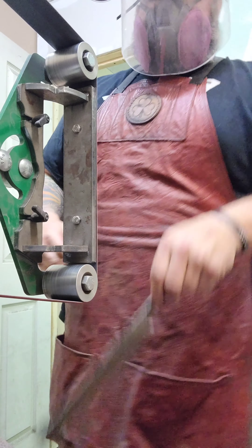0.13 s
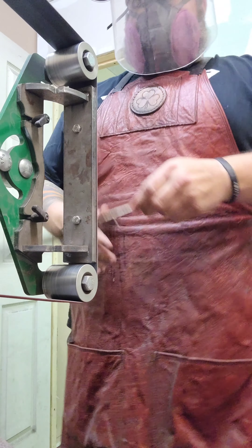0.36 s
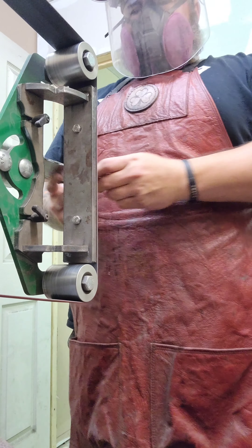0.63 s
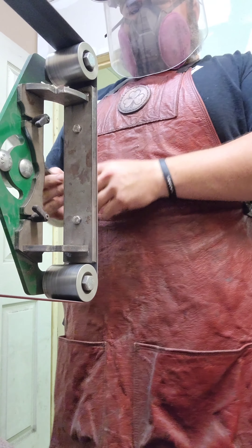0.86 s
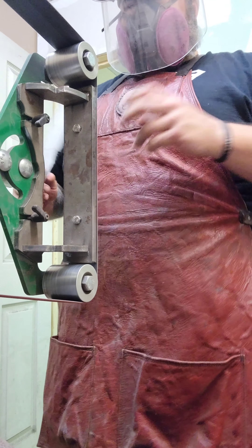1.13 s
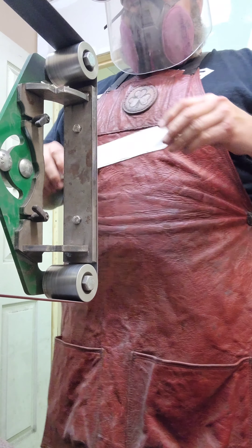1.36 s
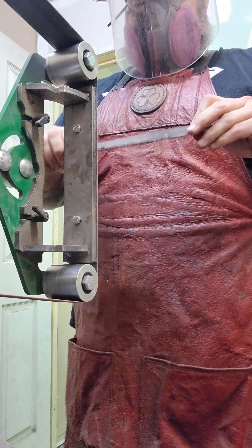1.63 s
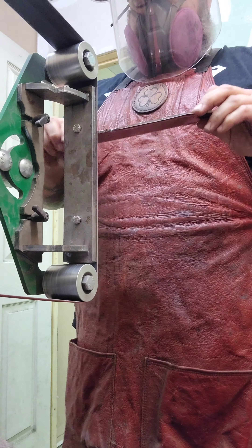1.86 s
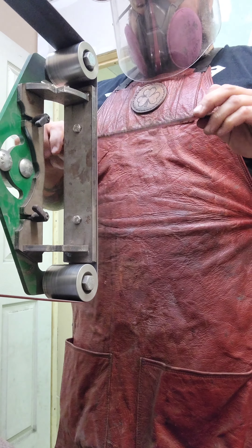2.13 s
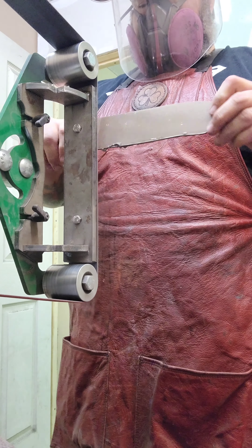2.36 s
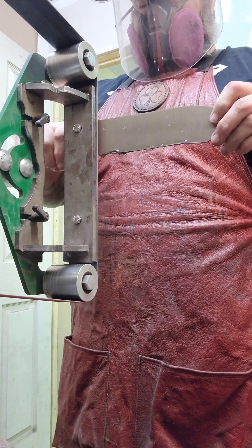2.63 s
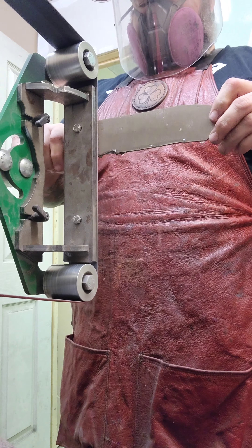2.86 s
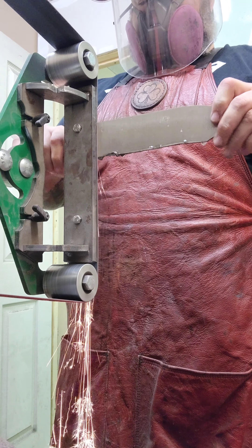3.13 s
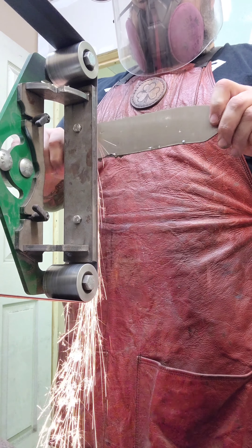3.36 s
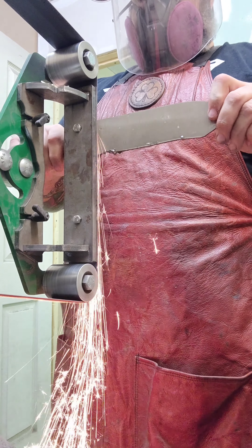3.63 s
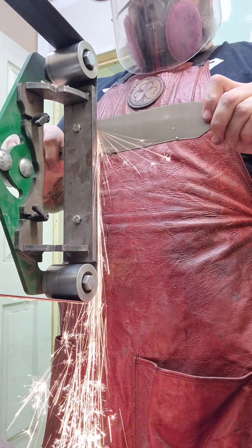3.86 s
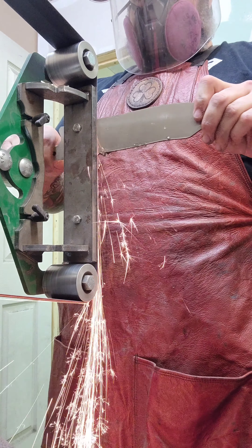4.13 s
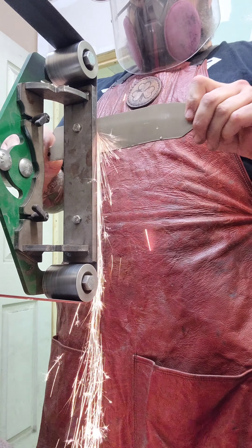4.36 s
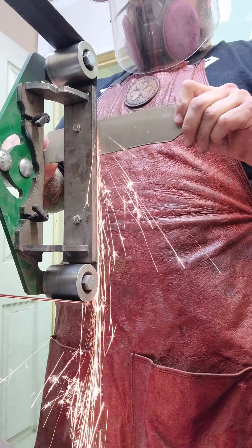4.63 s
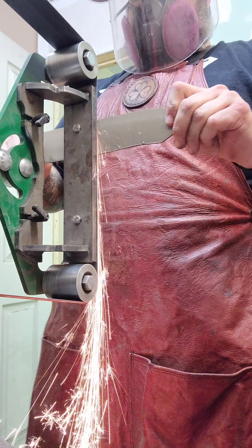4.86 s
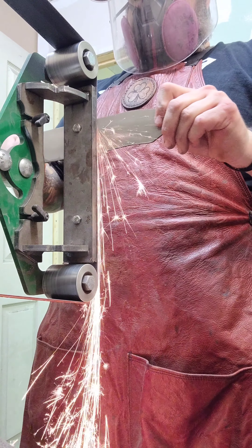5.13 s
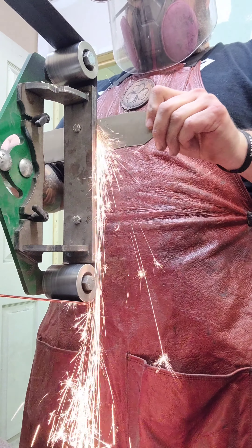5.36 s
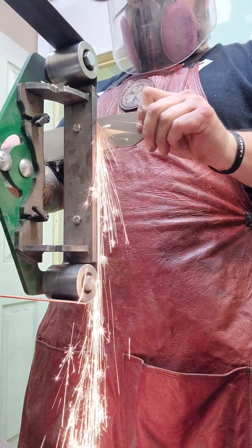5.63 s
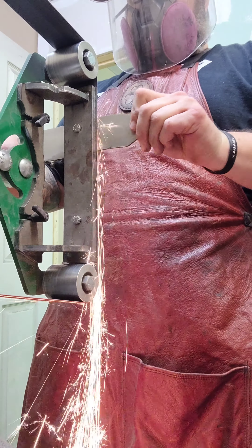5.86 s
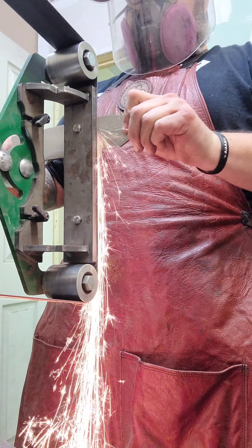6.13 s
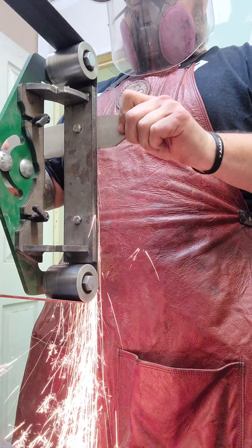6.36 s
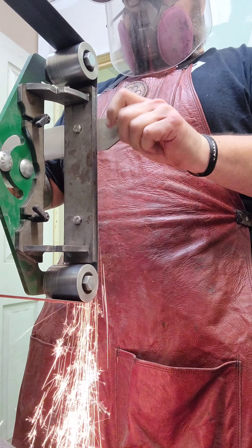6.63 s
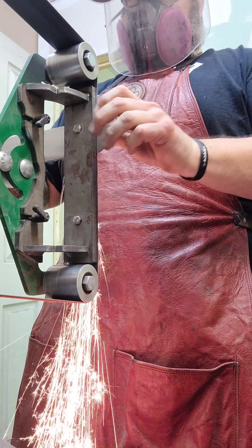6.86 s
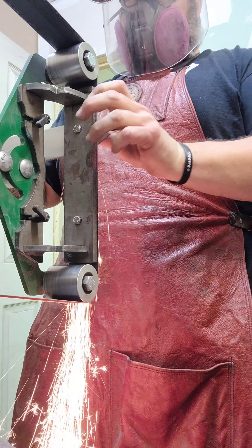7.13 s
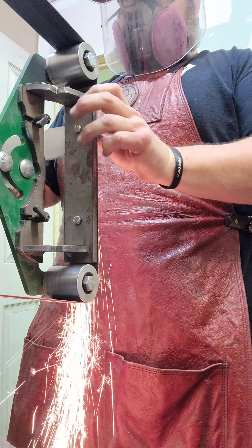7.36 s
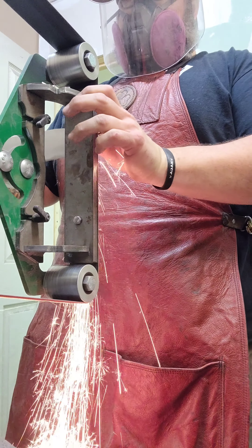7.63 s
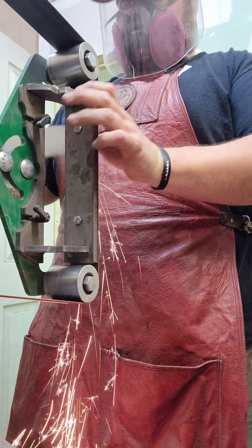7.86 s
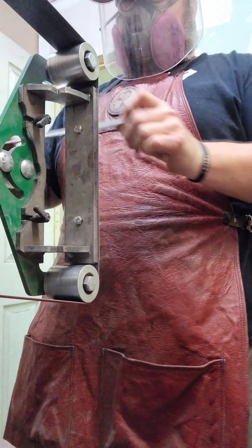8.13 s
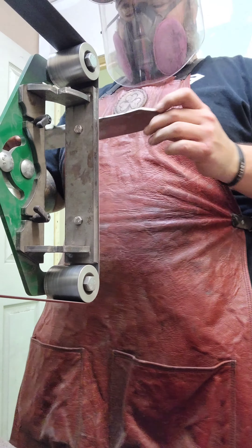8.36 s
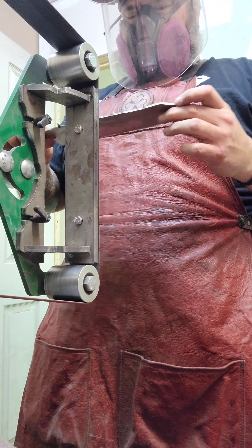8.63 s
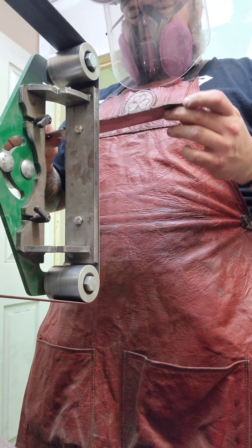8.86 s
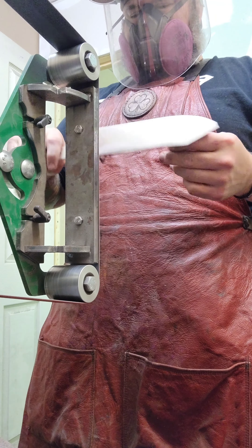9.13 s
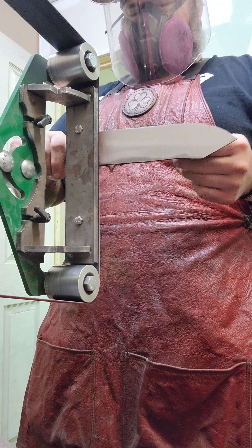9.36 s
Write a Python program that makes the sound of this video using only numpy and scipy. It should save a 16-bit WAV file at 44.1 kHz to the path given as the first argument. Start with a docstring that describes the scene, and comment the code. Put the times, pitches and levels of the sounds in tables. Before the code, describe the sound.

A close stereo microphone hears a grinder with a dense, bright, slightly fluttering belt noise, low roller hum and a thin wavering motor whine. A steel edge whistles briefly on contact, followed by a dull thud. Low, rough rumbling and a mid-pitched metallic rasp join the belt, shifting as the blade slides across. Then the grinding stops abruptly, leaving the steady machine in a small reflective workshop.

```python
"""In a small workshop a belt grinder runs. The grit of its belt sings over platen and rollers as noise and
close tones that partly repeat every lap; motor and roller bearings hum as harmonics tied to the belt.
A steel blade is laid on with a chirp and a thud, rumbles and rasps through resonances while it is drawn
across, and is lifted off. Two microphone ports hear the machine from the right."""
import sys
import numpy as np
from scipy import signal
from scipy.fft import rfft, irfft
from scipy.io import wavfile

SR = 44100
rng = np.random.default_rng(int(sys.argv[2]) if len(sys.argv) > 2 else 0)


def voltage_ratio(decibels):
    """Convert decibels (scalar or array-like) to amplitude ratios, 20 dB per decade."""
    exponent = np.asarray(decibels, float) / 20
    return 10 ** exponent


def dump_mix(stems):
    """Bounce the given channels to the path in sys.argv[1] as a 16-bit WAV at rate SR."""
    frames = np.atleast_2d(stems).T  # one column per channel
    limited = np.clip(frames, -1, 1)  # hard clip at full scale
    pcm = np.round(limited * 32767).astype(np.int16)
    wavfile.write(sys.argv[1], SR, pcm)


N = 418509

TOUCH_S, LIFT_S = 3.04, 7.95   # the blade first touches the belt, and is lifted
FREE_LAPS, LOADED_LAPS = 10.81, 10.96   # belt speeds, in laps per s, between which the upper hum changes


def in_time(rows):
    """Linear interpolation: the columns of a table, after its times in s, become curves."""
    s, *columns = np.transpose(rows)
    return [np.interp(np.arange(N) / SR, s, column) for column in columns]


def at_hz(points, hz):
    """Logarithmic frequency scale: a spectrum is read between its points on a log axis."""
    points = np.array(points)
    return np.interp(np.log(hz + 1), np.log(points[:, 0]), points[:, 1])


def drift(rate_hz):
    """Low-pass random process: noise through two equal poles wanders slowly, with standard deviation 1."""
    pole = np.exp(-80 * np.pi * rate_hz / SR)   # one step lasts 40 samples
    white = rng.standard_normal(N // 40 + 4002)
    slow = signal.lfilter([1], [1, -2 * pole, pole * pole], white)[4000:]
    return np.interp(np.arange(N) / 40, np.arange(len(slow)), slow / slow.std())


def pan(left_right_db):
    """Level difference: gains of the left and right port, half the difference each way."""
    return voltage_ratio([[left_right_db / 2], [-left_right_db / 2]])


def read_belt(profile, laps):
    """Fourier synthesis: one lap of surface, given as strength per cycle count, is read at the belt's position."""
    size = 2 ** 15
    surface = irfft(profile, size) * size / np.sqrt(2)
    closed = np.append(surface, surface[0])
    return np.interp(laps % 1 * size, np.arange(size + 1), closed)


def pattern(cycles, level_db, pan_db, laps, turn, waver_db):
    """Amplitude modulation: surface ripples lie in five tracks that press harder and softer on their own."""
    profile = np.zeros((2, 2000), complex)
    port_db = level_db + 1.5 + np.outer([.5, -.5], pan_db)
    profile[:, np.round(cycles).astype(int)] = voltage_ratio(port_db) * np.exp(2j * np.pi * turn)
    tracks = np.arange(2000) % 5
    total = 0
    for k in range(5):
        ports = np.array([read_belt(p * (tracks == k), laps) for p in profile])
        total = total + voltage_ratio(waver_db * drift(3.6)) * ports
    return total


# Periodicity of the grit noise: pitch_hz, power share alike in each lap (0-1)
REPEAT_SHARE = [(100, .5), (300, .7), (700, .6), (1500, .5), (3000, .78), (6500, .78), (8000, .22),
                (16000, .15)]
# Coherence of the ports: pitch_hz, left-right likeness (0-1)
PORT_LIKENESS = [(50, 0.65), (300, 0.81), (800, 0.7), (2500, 0.3), (5000, 0.74), (7500, 0.15), (16000, 0.2)]
# Level difference of the ports: pitch_hz, left_right_db
PORT_BALANCE = [(60, -4), (100, -1), (160, -6.5), (270, -3), (450, -14), (740, -5), (1220, -10),
                (2010, -7.5), (3330, -5), (5500, -10.5), (7500, -3), (9500, -1), (12500, -4.5), (14500, 10),
                (15600, 6)]
# Lag of the right port by the direct path and by way of the bench: lag_s
RIGHT_PATHS = [.00007, 0.000298]


def grit(laps):
    """Partial coherence: white noise spectra at both ports, partly the same every lap and partly fresh."""
    hz = np.fft.rfftfreq(N, 1 / SR)
    again = np.clip(at_hz(REPEAT_SHARE, hz), 0, 1)
    alike = np.clip(at_hz(PORT_LIKENESS, hz), 0, 1)
    heard = []
    for port in range(2):
        profile = rng.normal(size=2000) + 1j * rng.normal(size=2000)
        # these ripples are played on their own
        profile[[round(row[0]) for row in GRIT_RIDGES + BELT_WAVES]] = 0
        lap = read_belt(profile, laps)
        repeated = np.sqrt(again) * rfft(lap / lap.std())
        fresh = np.sqrt(1 - again) * rfft(rng.normal(size=N))
        heard.append(repeated + fresh)
    direct, bench = (np.exp(2j * np.pi * hz * s) for s in RIGHT_PATHS)
    right = heard[1]
    left = alike * (.75 * direct + .66 * bench) * right + np.sqrt(1 - alike ** 2) * heard[0]
    return hz, np.array([left, right]) * voltage_ratio(np.outer([.5, -.5], at_hz(PORT_BALANCE, hz)))


def coloured(noise, spectrum, peaks=(), lift_db=4.0):
    """Spectral shaping: noise through a spectrum with resonances on top; the mean of the ports has rms 1."""
    hz, white = noise
    gain_db = at_hz(spectrum, hz)
    for centre_hz, width_hz, _ in peaks:
        gain_db = gain_db + lift_db / (1 + (2 * (hz - centre_hz) / width_hz) ** 2)
    out = irfft(white * voltage_ratio(gain_db), N)
    return out / out.mean(axis=0).std()


# Strongest ridges of the grit, relative levels: cycles_per_lap, free_db, under_blade_db, left_right_db
GRIT_RIDGES = [(149, -57, -56, -14), (185, -55, -52, -8), (186, -54, -56, -10), (194, -58, -54, -5),
               (201, -55, -54, -10), (209, -51, -59, -9), (212, -58, -55, -4), (229, -56, -52, -8),
               (233, -53, -55, -9), (253, -50, -59, -11), (262, -54, -47, -10), (267, -47, -51, -3),
               (286, -43, -51, -2), (287, -44, -44, -8), (291, -44, -48, -7), (297, -44, -39, -5),
               (302, -42, -43, -14), (303, -43, -44, -13), (313, -42, -41, -10), (314, -40, -42, -8),
               (318, -43, -47, -10), (324, -40, -48, -13), (347, -43, -43, -9), (359, -51, -40, -4),
               (369, -43, -40, -6), (379, -39, -46, -11), (392, -41, -44, -13), (412, -41, -41, 0),
               (418, -43, -40, -5), (426, -46, -41, -5), (427, -43, -42, -7), (428, -41, -40, -7),
               (433, -38, -38, -10), (438, -42, -41, -13), (445, -42, -42, -8), (449, -42, -50, -6),
               (471, -42, -34, -9), (483, -39, -40, -9), (500, -41, -40, -17), (510, -41, -41, -8),
               (523, -41, -44, -11), (536, -38, -42, -16), (546, -37, -40, -16), (570, -52, -42, -12),
               (588, -44, -46, -12), (600, -39, -41, -9), (612, -42, -44, -14), (624, -45, -47, -13)]
# Spectrum of the song: pitch_hz, relative level_db (per Hz)
SONG_SPECTRUM = [(800, -23), (1410, -20), (2400, -22.5), (2750, -10), (3320, -2), (3600, -7), (3940, 1.5),
                 (4320, -3), (4620, 0.5), (4950, 1), (5290, 2), (6610, -1.5), (7600, -14), (9880, -29),
                 (16700, -120)]
# Resonances of the platen: centre_hz, width_hz, level_db (not read; all get one lift)
PLATEN_MODES = [(3200, 150, -2), (4080, 520, -2), (4800, 350, -1), (5500, 140, 0), (5500, 63, 0),
                (6900, 100, -2), (6800, 80, -7)]
# Spectrum of the air hiss: pitch_hz, relative level_db (per Hz)
AIR_SPECTRUM = [(4410, -30), (7500, 0.5), (7730, -4.5), (8350, -1), (9580, -2), (10700, 1.5), (14900, -10),
                (15600, -4)]


def belt(laps, contact):
    """Periodic excitation: grit sings on the platen, ridges as wavering tones, hiss above; all swell once a lap."""
    t = np.arange(N) / SR
    # briefly quieter as the blade comes free
    dip_db = -1 * np.exp(-((t - LIFT_S) / .08) ** 2)

    cycles, free_db, loaded_db, pan_db = np.transpose(GRIT_RIDGES)
    port_turn = np.outer([1, 0], rng.normal(0, 0.16, len(cycles)))
    turn = rng.random(len(cycles)) + port_turn
    free = pattern(cycles, free_db - .8, pan_db, laps, turn, waver_db=2.0)
    loaded = pattern(cycles, loaded_db - 1.2, pan_db, laps, turn, waver_db=2.2)
    ridges = (1 - contact) * free + contact * loaded

    noise = grit(laps)
    song = voltage_ratio(-21 + dip_db + .35 * drift(7.2)) * coloured(noise, SONG_SPECTRUM, PLATEN_MODES, lift_db=0.5)
    air = voltage_ratio(-27 + dip_db + .46 * drift(4.7)) * coloured(noise, AIR_SPECTRUM)

    # the swell per lap waxes and wanes; it falls later in the lap under the blade
    depth_db = 1.05 + .55 * np.cos(2 * np.pi * (t - 2.1) / 3.4)
    lap_phase = 2 * np.pi * (laps - .33 - .27 * contact)
    # the dip of each lap is narrower than its swell
    swell_db = depth_db * (np.cos(lap_phase) - .4 * np.cos(2 * lap_phase))
    # the swell lives mostly above 4900 Hz
    low_pass = signal.butter(4, 4900, fs=SR, output="sos")
    low = signal.sosfiltfilt(low_pass, song + ridges)
    high = song + ridges + air - low
    return low * voltage_ratio(.05 * swell_db) + high * voltage_ratio(swell_db)


def mode(noise, centre_hz, width_hz):
    """Resonance: noise through a steep-sided peak; the mean of the ports has rms 1."""
    hz, white = noise
    detuning = (hz - centre_hz) / width_hz * 1.4
    out = irfft(white / (1 + detuning ** 2) ** 2, N)
    return out / out.mean(axis=0).std()


# Waves in the belt that shake the blade, relative levels: cycles_per_lap, level_db, left_right_db
BELT_WAVES = [(13, -53, -21), (14, -52.5, -5), (15, -46, -10), (16, -41, -4), (17, -48, -6), (19, -37, -6),
              (20, -42, -8), (21, -30, -3), (22, -38.5, -16), (25, -41.5, -5), (27.1, -37.5, 0),
              (28.2, -41, 1), (30, -47.5, -1), (31, -48.5, -8), (32, -48, -7), (34, -56, 2), (38, -53.5, 6),
              (39, -52, -15.5), (42.83, -41, -8.5), (43, -46.5, -7), (45, -58, 9), (52, -51.5, 9),
              (58, -55, 16), (89.6, -57, -24), (95, -58, -10), (97.6, -41.5, -16), (98.8, -52, -7),
              (117.6, -48.5, -21), (123, -49, -14), (143.5, -47, -8), (183.3, -52, 0)]
# How hard the blade is pressed, as the gain of its rumble: time_s, level_db
PRESSING = [(3.05, -18), (3.2, -28), (3.33, -35.5), (3.6, -30), (3.98, -30.5), (4.3, -29.5), (5.1, -29),
            (5.95, -27), (6.32, -32), (6.9, -31.5), (7.3, -30.5), (7.66, -34), (7.95, -38)]
# Spectrum of the rumble: pitch_hz, relative level_db (per Hz)
RUMBLE_SPECTRUM = [(60, -45), (110, -38), (150, -3), (231, 4), (340, 3), (456, -12.5), (560, -37),
                   (655, -4.5), (900, -15.5), (1100, -51)]
# Spectrum of the rasp: pitch_hz, relative level_db (per Hz)
RASP_SPECTRUM = [(500, -32), (650, -5), (850, -0.5), (1200, -21.5), (2000, 0.5), (2350, -26), (2700, 6),
                 (3300, -27)]
# Blade modes: centre_hz, width_hz
BLADE_MODES = [(165, 60), (465, 110), (1055, 150), (1370, 250), (1660, 230)]
# Modes swell and sink as their nodes pass the belt, a row for each blade mode: level_db (mid-reach, before
# the swing), middle_s, fall_db_per_s2, swing_db, swell_s (time of one swell), period_s (between swells)
MODE_SWELLS = [(-43.5, 5.6, 1, 5, 4.25, 1.73), (-38, 4.6, 0.87, 4, 4.45, 2.07),
               (-36, 4.7, 2.5, 4, 4.14, 1.42), (-38.5, 3.4, 0.28, 2.5, 2.65, 4.6),
               (-50.5, 5.55, -1.5, 6, 3.46, 1.32)]


def blade(laps, contact):
    """Forced vibration: belt waves shake the blade in a low growl; the cut rasps and excites the blade's modes."""
    press_db, = in_time(PRESSING)
    t = np.arange(N) / SR
    noise = grit(laps)

    cycles, level_db, pan_db = np.transpose(BELT_WAVES)
    turn = rng.random(len(cycles)) + np.outer([.005, 0], cycles)
    growl = pattern(cycles, level_db + 27.5, pan_db, laps, turn, waver_db=2.0) * voltage_ratio(.9 * drift(7))
    rough = voltage_ratio(-12 + 3 * drift(9)) * coloured(noise, RUMBLE_SPECTRUM)
    rumble = voltage_ratio(press_db) * (growl + rough)

    # the rasp fades by 1 dB per s
    rasp = voltage_ratio(-41 - (t - TOUCH_S) + 4 * drift(6.6)) * coloured(noise, RASP_SPECTRUM)

    rings = 0
    for (centre_hz, width_hz), row in zip(BLADE_MODES, MODE_SWELLS):
        mid_db, middle_s, fall, swing_db, swell_s, period_s = row
        reach_db = mid_db - fall * (t - middle_s) ** 2
        ring_db = reach_db + swing_db * np.cos(2 * np.pi * (t - swell_s) / period_s)
        rings = rings + voltage_ratio(ring_db + 2 * drift(19)) * mode(noise, centre_hz, width_hz)
    return contact * (rumble + rasp + rings)


# Whistling modes of the edge: pitch_hz (mean), relative level_db
EDGE_MODES = [(10430, 0), (6900, -1)]
# Whistles of the edge: peak_s, level_db (before mode and port gains), rise_s (9 dB up to the peak),
# fall_t60_s (60 dB down)
EDGE_WHISTLES = [(2.975, -23, .035, .22), (4.2, -38, .3, 1.5)]


def chirp():
    """Frequency modulation: the edge whistles around the first touch and faintly once more, near the right port."""
    waver_hz = 35 * drift(30)
    tones = 0
    for pitch_hz, level_db in EDGE_MODES:
        phase = 2 * np.pi * np.cumsum(pitch_hz + waver_hz) / SR
        tones = tones + voltage_ratio(level_db + 2 * drift(40)) * np.sin(phase)
    t = np.arange(N) / SR
    swell = 0
    for peak_s, level_db, rise_s, t60_s in EDGE_WHISTLES:
        rising_db = 9 * ((peak_s - t) / rise_s) ** 2
        falling_db = 60 * (t - peak_s) / t60_s
        below_db = np.where(t < peak_s, rising_db, falling_db).clip(0, 200)
        swell = swell + voltage_ratio(level_db - below_db)
    return swell * tones * voltage_ratio([[-5], [3.5]])


def landing():
    """Damped oscillation: a dull thud, gliding upward as it decays, as the flat of the blade meets the platen."""
    start_s, start_hz, rise_hz_per_s, t60_s = 3.3, 200, 97, .35
    since = np.maximum(np.arange(N) / SR - start_s, 0)
    swell = (1 - np.exp(-since / .012)) * voltage_ratio(-22 - 60 * since / t60_s)
    cycles = (start_hz + rise_hz_per_s * since / 2) * since
    return swell * np.sin(2 * np.pi * cycles) * pan(-5)


# Motor hum running free and under the blade, before a common lift: level_db
MOTOR_LEVELS = [-45, -50]
# Roller bearing hum, relative levels: harmonic (rounded for pitch), free_db, under_blade_db, left_right_db
ROLLER_HUM = [(1, -46, -56, 1), (2, -30.5, -48, -8.5), (3, -42, -48, -9), (4, -60, -51, -20),
              (5, -39.5, -49.5, -10), (7, -58, -68, 16), (8, -45.5, -50, -17), (9, -41, -68, -11),
              (10, -46.5, -70, -17.5), (11, -56, -68, -11)]
# Spectrum of the frame's rumble: pitch_hz, relative level_db (per Hz)
FRAME_SPECTRUM = [(20, -23), (60, -28), (130, -10), (190, -15), (240, 3), (325, -14.5), (390, -8.5),
                  (480, -20.5), (620, -12.5), (850, -25), (930, -17), (1180, -11), (1500, -18.5),
                  (2300, -10.5), (2800, -18), (3400, -20)]


def machine(laps, contact):
    """Harmonics of rotation over frame rumble: the blade damps low hum, upper hum leaves resonance with speed."""
    motor_per_lap, roller_per_lap = 4.617, 11.574   # turns per belt lap
    t = np.arange(N) / SR
    speed, = in_time(BELT_SPEED)
    faster = np.clip((speed - FREE_LAPS) / (LOADED_LAPS - FREE_LAPS), 0, 1)
    far_port = np.array([[1], [0]])

    motor_turn = motor_per_lap * laps + far_port * (.028 + .015 * drift(3))
    motor = voltage_ratio(np.interp(faster, [0, 1], MOTOR_LEVELS) + 3.5) * np.sin(2 * np.pi * motor_turn)
    motor = motor * voltage_ratio(.8 * drift(5))
    # magnetic hum of the motor at 118.6 Hz
    magnetic = voltage_ratio(-58.5 - 8.2 * contact) * np.sin(2 * np.pi * 118.6 * t + .67 * far_port)
    hum = motor + magnetic

    # the roller hum comes back softer after the lift
    after_db = -2.5 * (np.arange(N) > LIFT_S * SR) * (1 - faster)
    for k, free_db, loaded_db, pan_db in ROLLER_HUM:
        load = contact if k < 3.5 else faster
        level = voltage_ratio(free_db + load * (loaded_db - free_db) + 1.5 + after_db)
        waver = voltage_ratio(np.sqrt(k) * (.4 * drift(5) + .6 * drift(1)))
        turn = round(k) * roller_per_lap * laps + .011 * k * drift(8.2) + rng.random()
        turn = turn + far_port * (.031 * k + .056 * drift(2.5))
        hum = hum + level * waver * pan(pan_db) * np.sin(2 * np.pi * turn)
    return hum + voltage_ratio(-30 + 1.86 * drift(14.6)) * coloured(grit(laps), FRAME_SPECTRUM)


# Whine of the motor drive: pitch_hz (mean), level_db (mean), left_right_db
DRIVE_WHINE = [(7125, -44, -6)]


def whine():
    """Random modulation: a thin, broken tone of the motor drive wavers in pitch and level."""
    total = 0
    for pitch_hz, level_db, pan_db in DRIVE_WHINE:
        level = voltage_ratio(level_db + 4 * drift(6)) * pan(pan_db)
        phase = 2 * np.pi * np.cumsum(pitch_hz + 18 * drift(12)) / SR
        total = total + level * np.sin(phase)
    return total


# Interference of echoes off bench and walls, mostly cancelling: centre_hz, width_hz, level_db
ECHO_DIPS = [(826, 79, -4), (920, 43, -5.5), (1078, 34, -12), (1952, 17, -9), (2326, 40, -11.5),
             (3345, 47, 3), (4370, 50, -3.5), (4980, 61, -8.5), (6100, 150, -1.5), (6820, 64, -8),
             (7520, 95, -14), (9630, 180, -5.5), (13100, 200, 7.5), (14050, 270, 4)]


def workshop(x):
    """Interference: echoes cut narrow dips in the colour and raise a few peaks."""
    hz = np.fft.rfftfreq(N, 1 / SR)
    gain_db = sum(db / (1 + (2 * (hz - f) / width) ** 2) for f, width, db in ECHO_DIPS)
    return irfft(rfft(x) * voltage_ratio(gain_db), N)


def touching():
    """Contact force, 0-1: the blade seats exponentially, eases off a little, then leaves at once."""
    t = np.arange(N) / SR
    seated = 1 - np.exp(-np.maximum(t - TOUCH_S, 0) / .14)
    return seated * np.interp(t, [LIFT_S - .15, LIFT_S - .05, LIFT_S + .037], [1, .74, 0])


# Belt speed before its tremble: time_s, speed_laps_per_s
BELT_SPEED = [(0, 10.803), (3.17, 10.804), (3.35, 10.906), (3.8, 10.992), (3.95, 10.992), (4.35, 10.959),
              (4.85, 10.977), (5.6, 10.987), (6.15, 10.958), (6.75, 10.948), (6.95, 10.976), (7.35, 10.993),
              (7.95, 10.965), (8.12, 10.799), (9.49, 10.803)]


def scene():
    """Superposition: sources add; belt, machine and blade follow the laps, which tremble more under the blade."""
    contact = touching()
    speed, = in_time(BELT_SPEED)
    tremble = (.002 + .009 * contact) * drift(4)   # the hand on the blade
    laps = np.cumsum(speed + tremble) / SR
    grinding = belt(laps, contact) + blade(laps, contact) + chirp() + landing()
    return workshop(grinding + machine(laps, contact) + whine())


def roll_off(x):
    """The treble ends steeply here."""
    return signal.sosfilt(signal.butter(12, 16860, fs=SR, output="sos"), x)


def record(dry):
    """Saturation and band limiting: peaks are rounded, then the top is cut steeply."""
    rounded = 1.5 * np.tanh(dry / 1.5)
    low_pass = signal.ellip(12, .5, 70, 15760, fs=SR, output="sos")   # edge at 15760 Hz
    finished = signal.sosfilt(low_pass, rounded)
    return roll_off(finished)


dry = scene()
out = record(dry)
dump_mix(out)
```